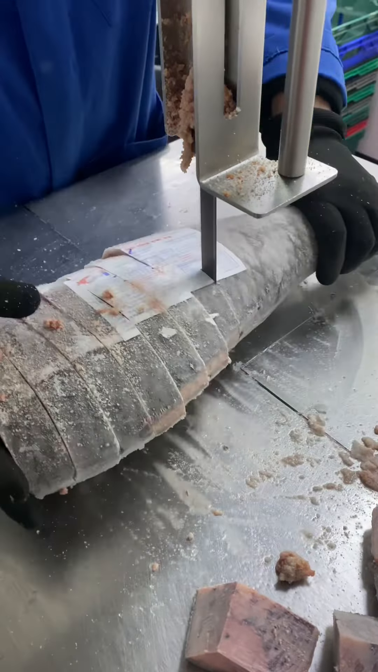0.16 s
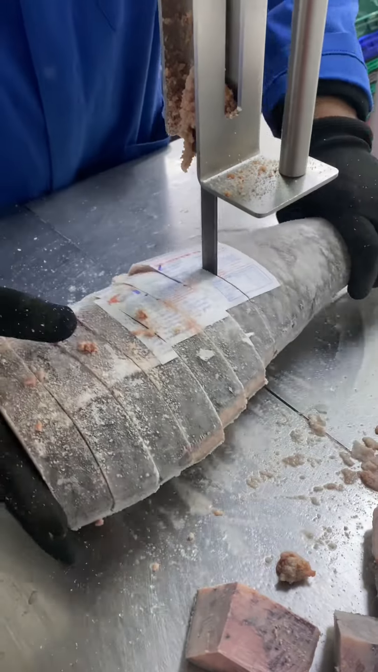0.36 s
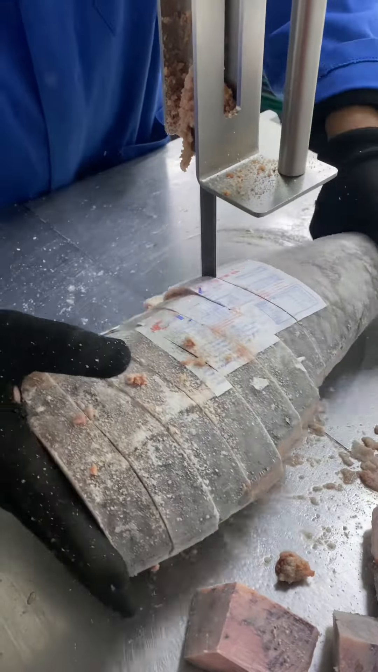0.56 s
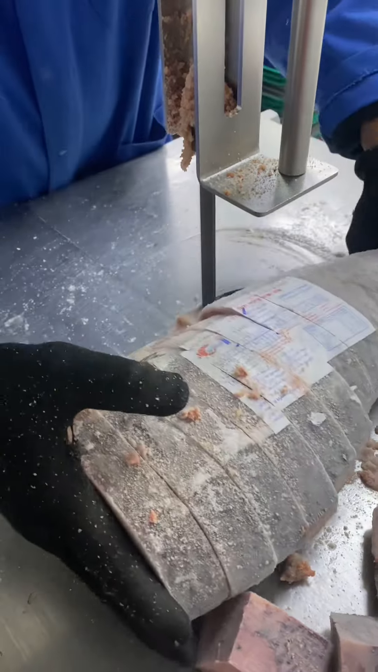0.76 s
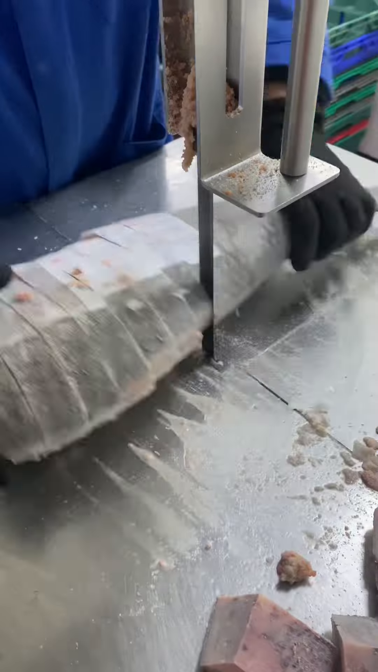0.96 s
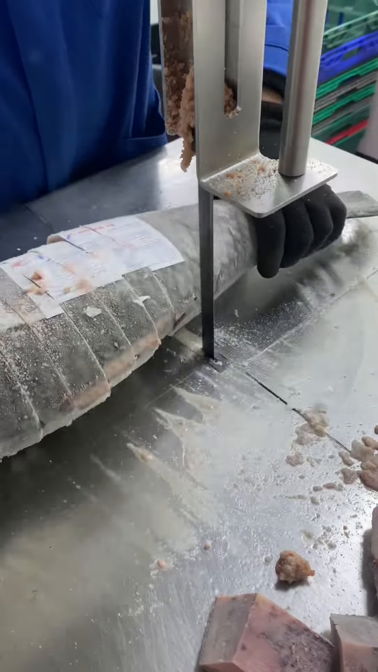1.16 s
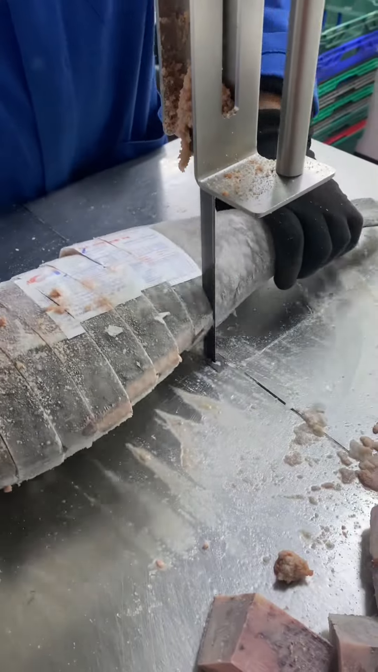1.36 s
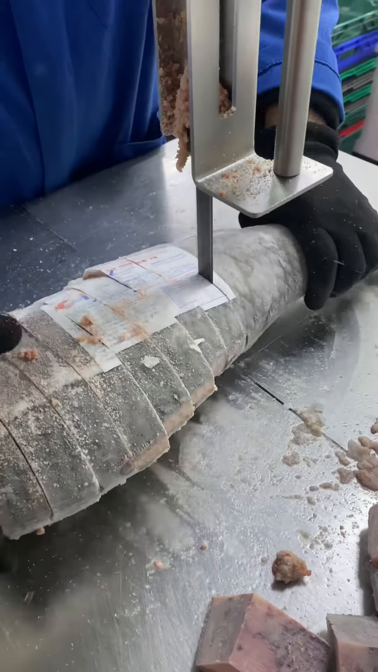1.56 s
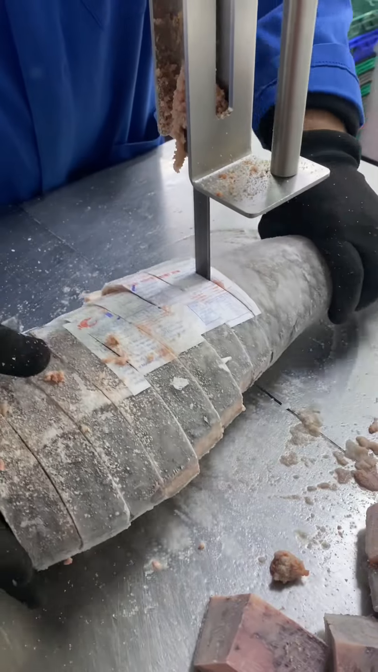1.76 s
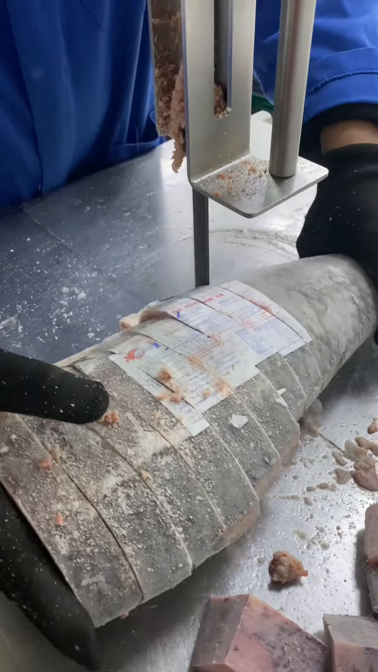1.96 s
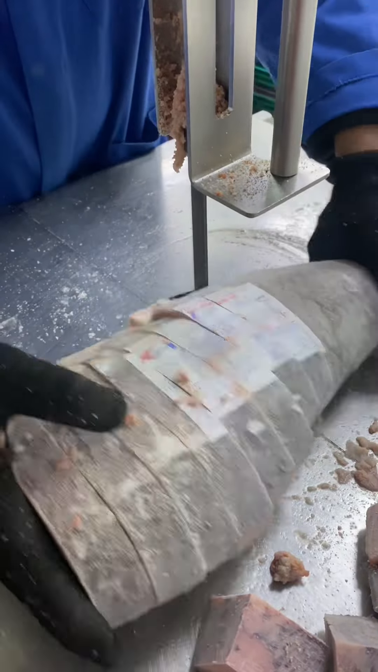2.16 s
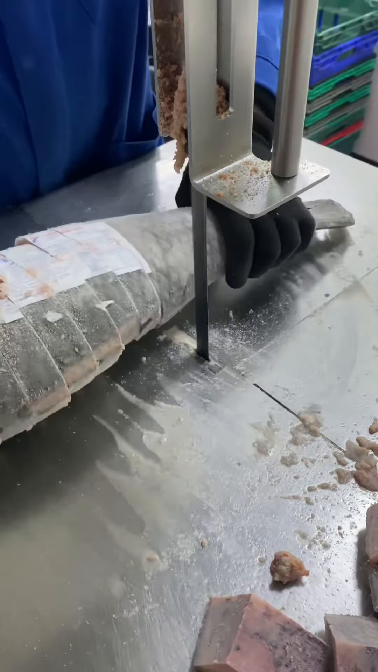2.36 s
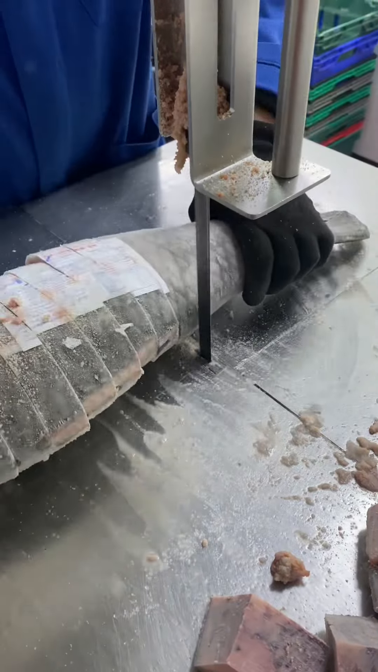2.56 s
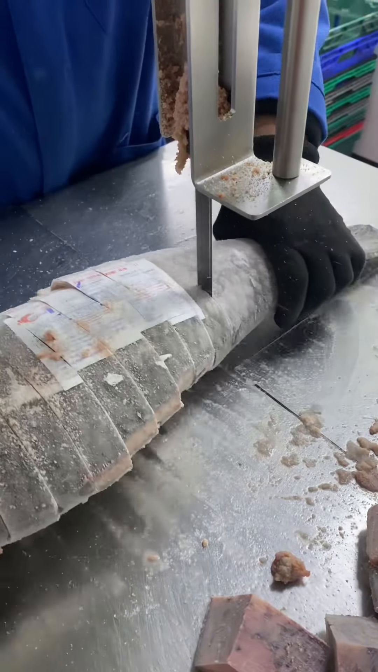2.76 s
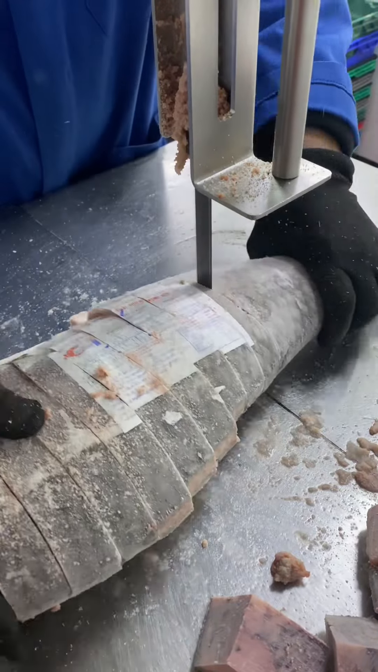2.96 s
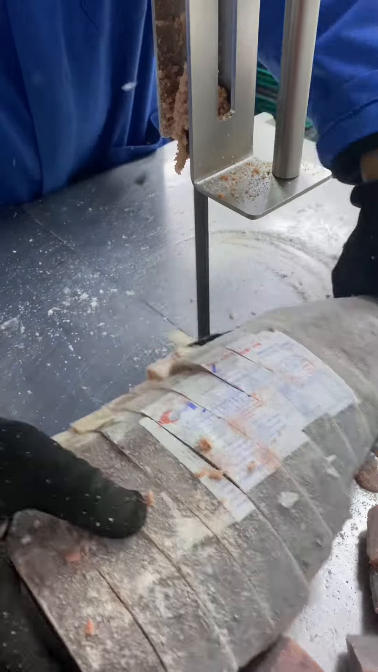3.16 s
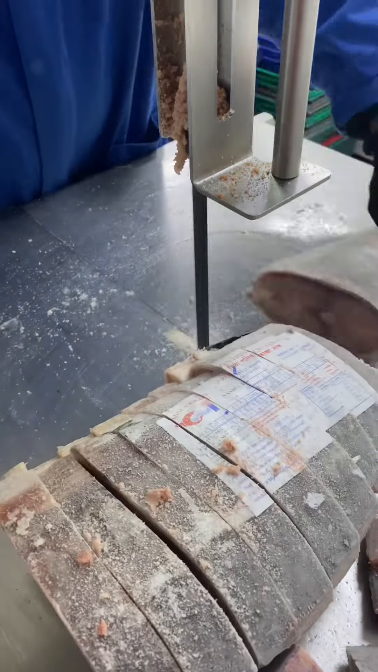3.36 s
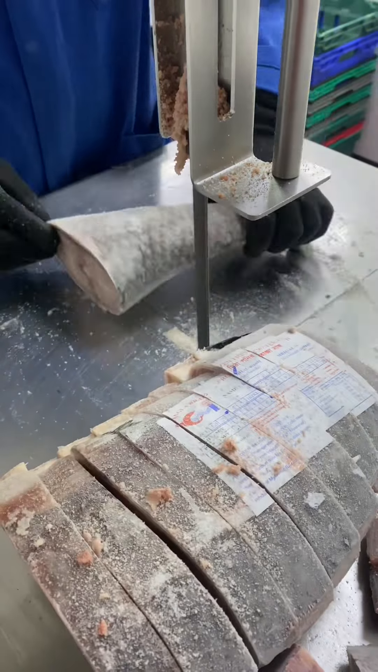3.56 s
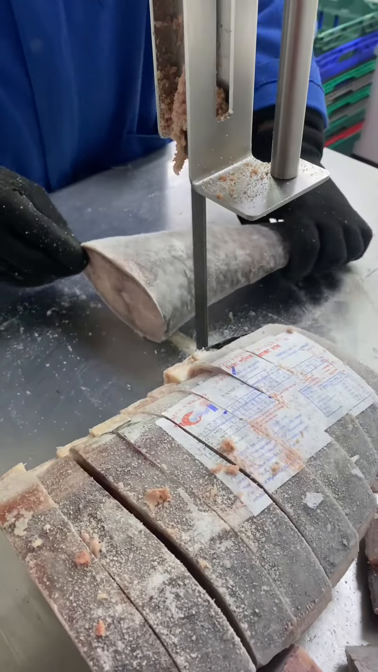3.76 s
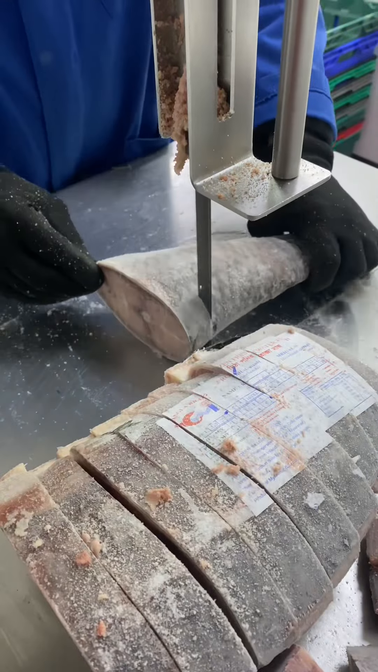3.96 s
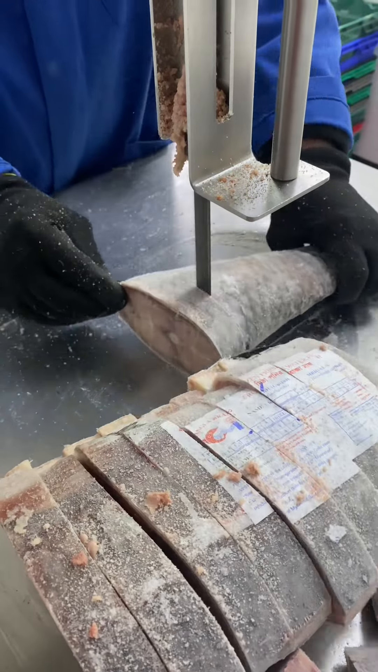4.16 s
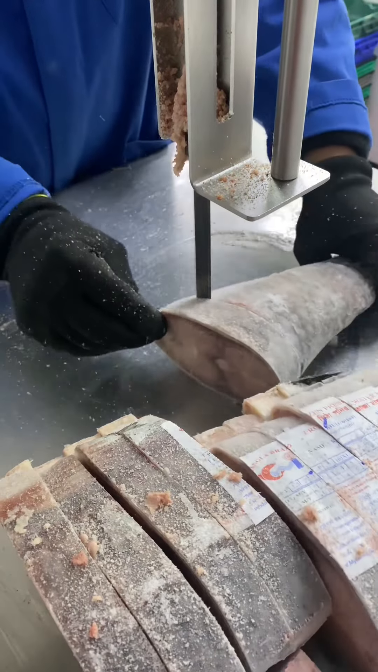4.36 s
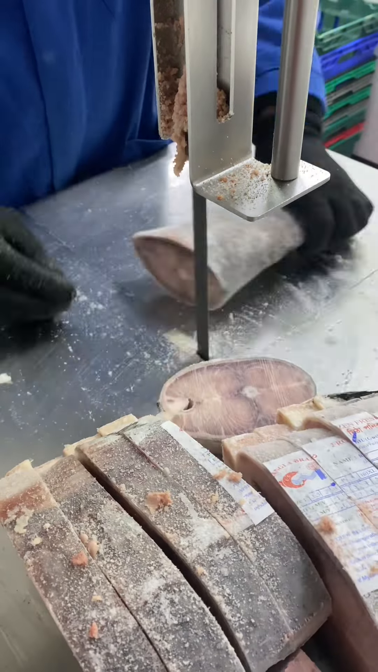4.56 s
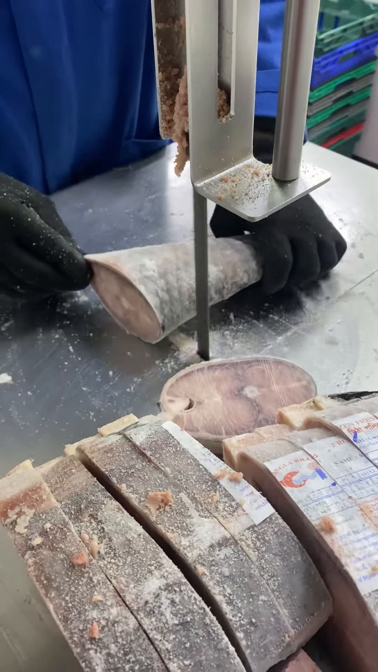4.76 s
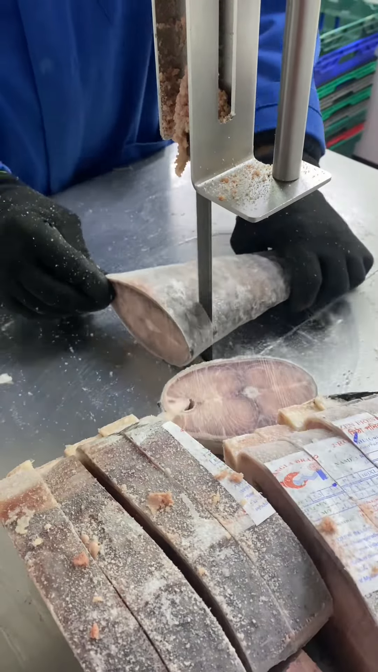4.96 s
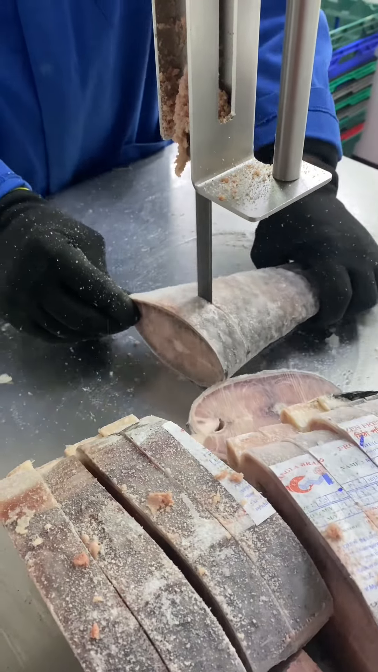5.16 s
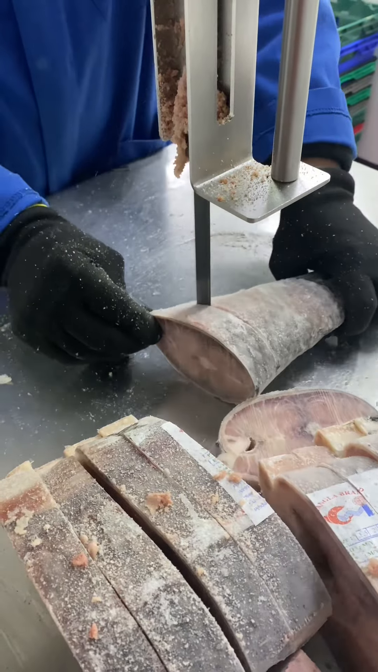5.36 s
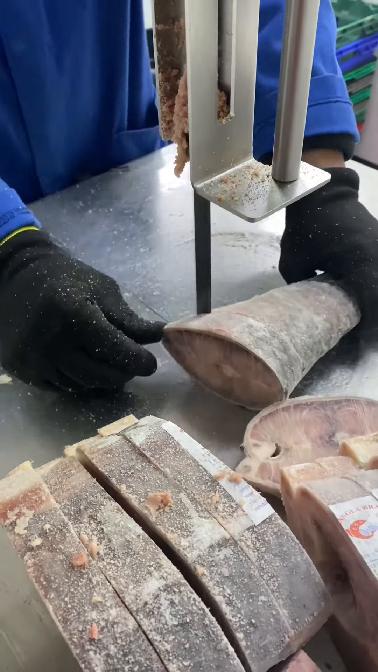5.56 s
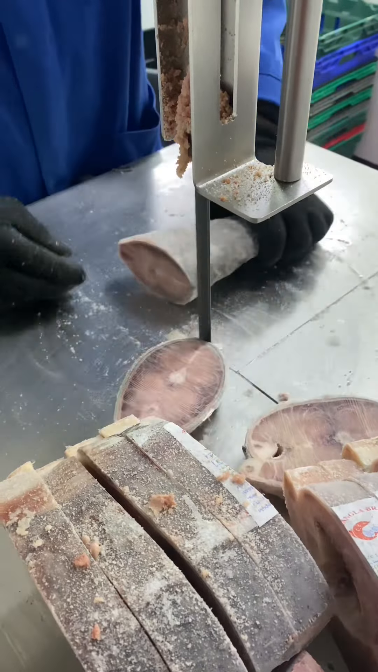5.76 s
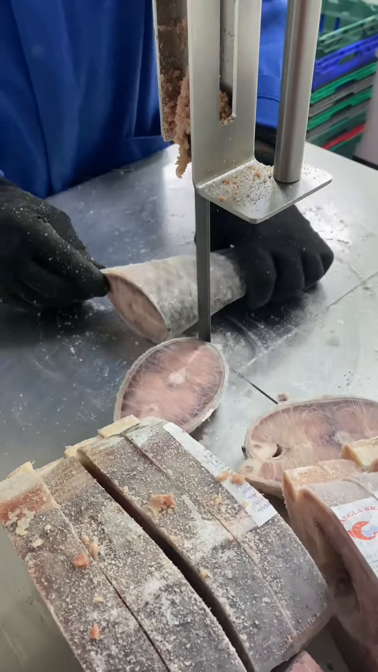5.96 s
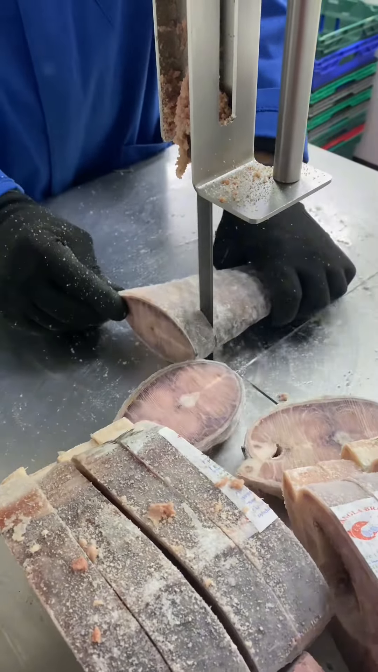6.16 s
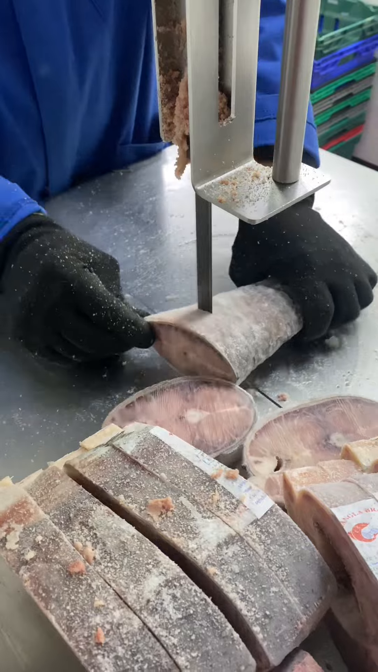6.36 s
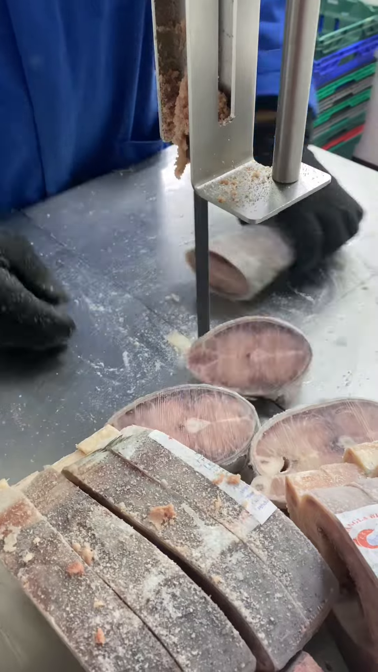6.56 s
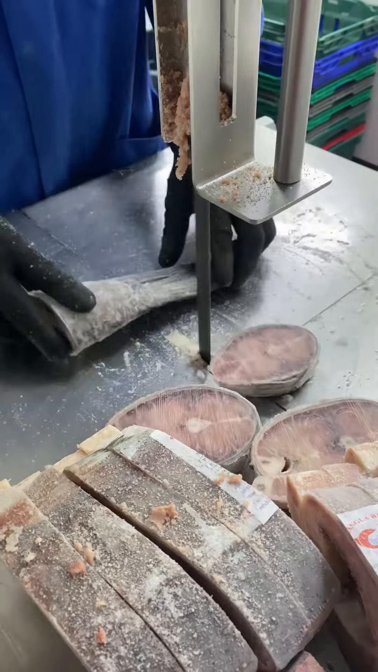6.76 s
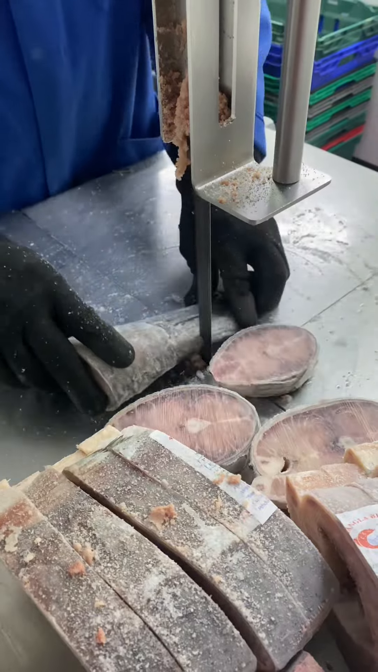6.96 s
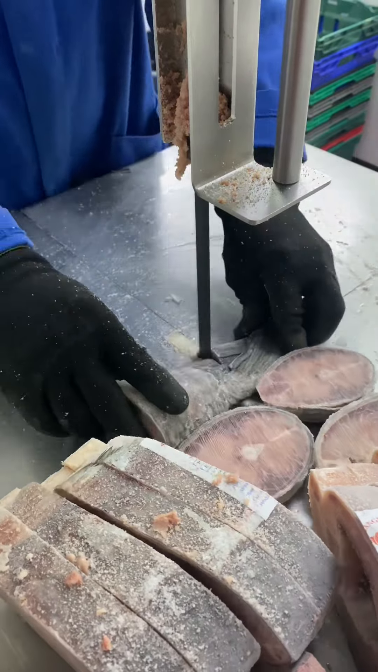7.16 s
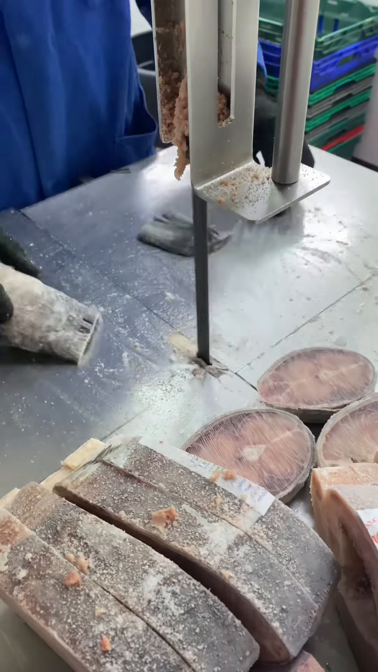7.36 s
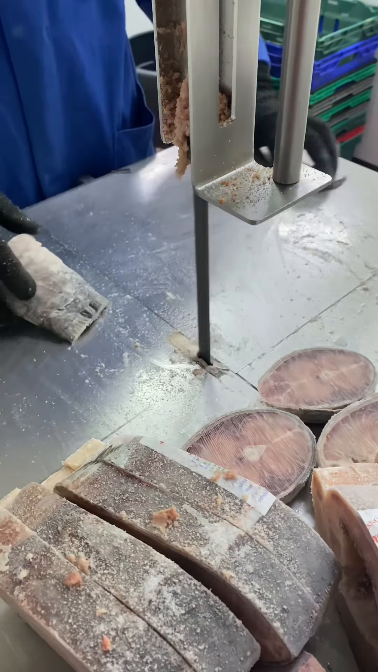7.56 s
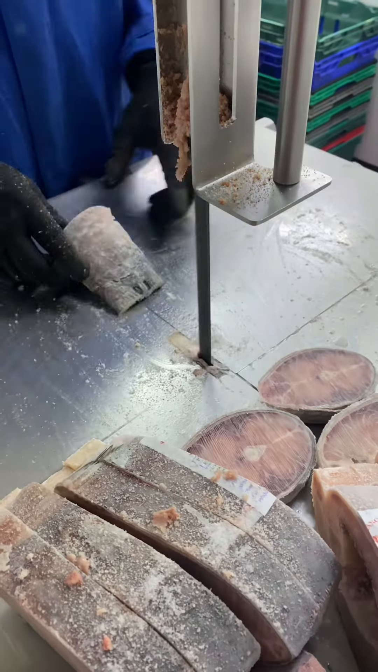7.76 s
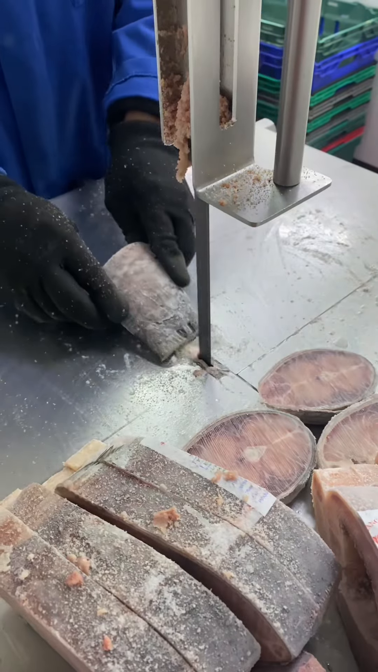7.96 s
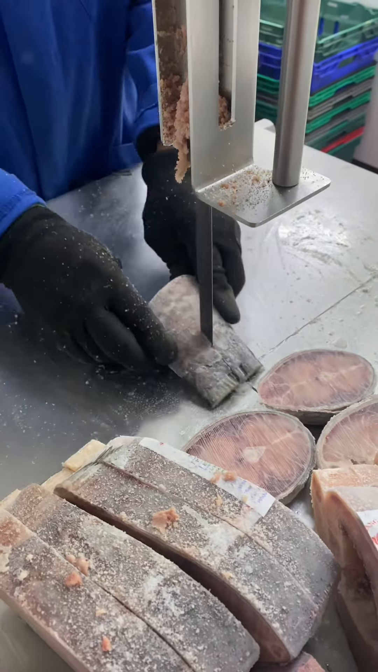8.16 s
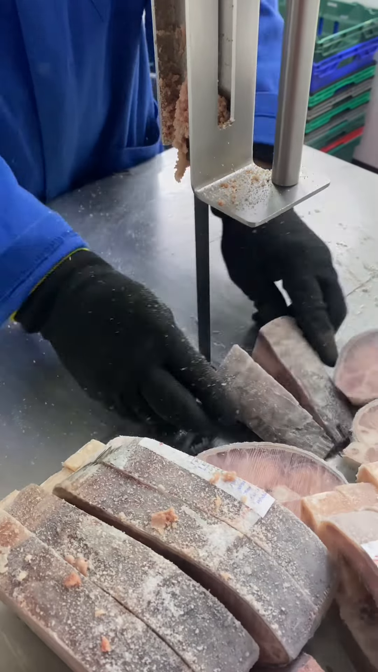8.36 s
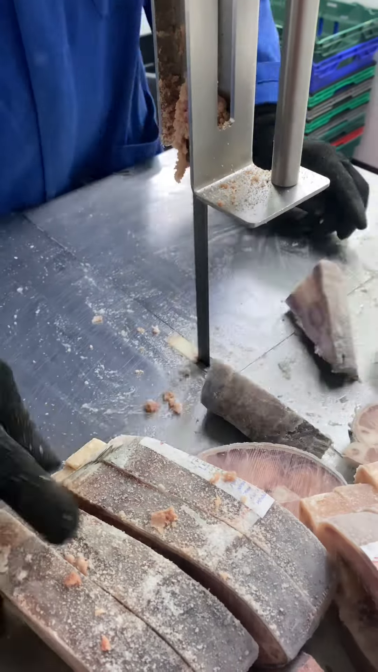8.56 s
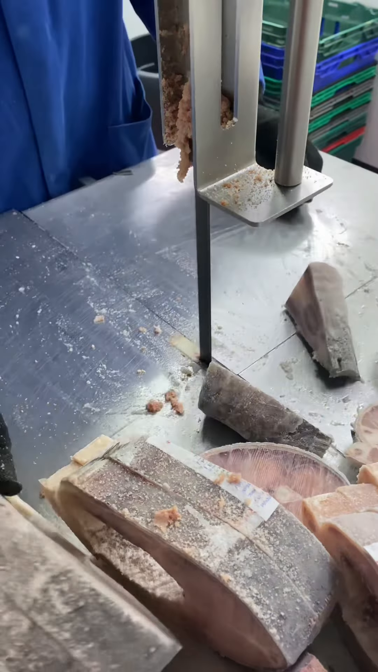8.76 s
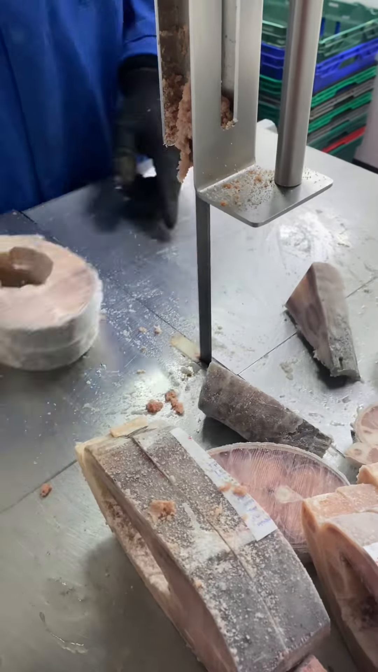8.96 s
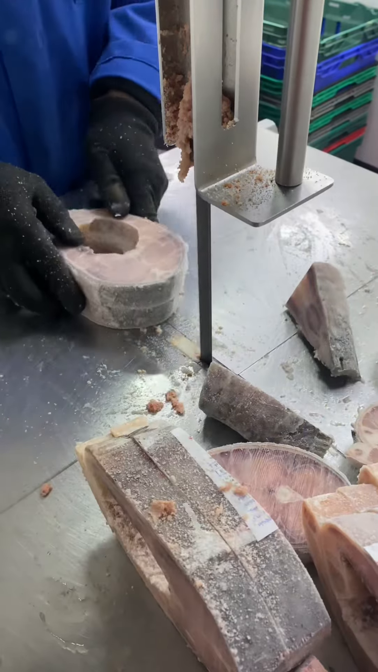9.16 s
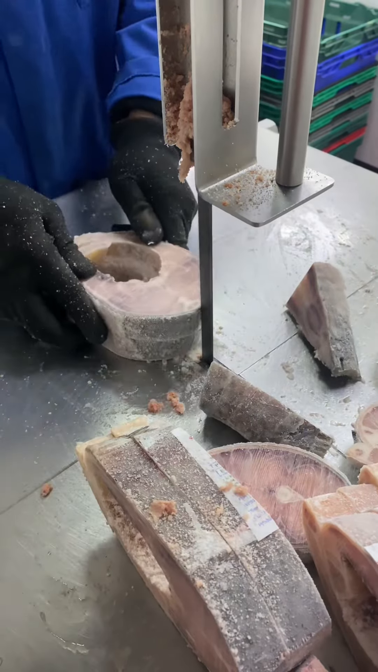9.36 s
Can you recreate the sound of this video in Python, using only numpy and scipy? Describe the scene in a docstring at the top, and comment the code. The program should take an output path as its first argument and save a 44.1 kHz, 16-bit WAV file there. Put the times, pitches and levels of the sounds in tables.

```python
"""A band saw is already cutting frozen fish on a steel table; nine cuts follow one another, with pauses.
In each cut the teeth strike steadily: a whine of overtones in grinding and groaning noise, until the blade
is out. All along, a motor rumbles and the running blade hisses, whistles and sizzles.
From the first cut on, slices knock on the table as short ringing tones, some with the snap of a bone.
Later, faint whines swell and fade, ice chips tick as short noise bursts, and the end falls in the last cut."""
import sys
import numpy as np
from scipy import signal
from scipy.fft import rfft, irfft, next_fast_len
from scipy.io import wavfile
from scipy.ndimage import uniform_filter1d, map_coordinates

SR = 44100
rng = np.random.default_rng(int(sys.argv[2]) if len(sys.argv) > 2 else 0)


def transcribe(signal):
    """Save signal, clipped to [-1, 1], as a 16-bit WAV file at the path in sys.argv[1]."""
    frames = np.atleast_2d(signal).T
    limited = np.clip(frames, -1, 1)
    pcm = np.round(limited * 32767).astype(np.int16)
    wavfile.write(sys.argv[1], SR, pcm)


def boost(x):
    """Linear amplitude factor 10**(x/20) for a level x in decibels (scalar or array-like)."""
    u = np.asarray(x, float) / 20
    return 10 ** u


N = 414981  # length of the scene in samples


def unit(x):
    """Scales a sound to an average strength (rms) of 1."""
    return x / np.sqrt(np.mean(np.abs(x) ** 2) + 1e-20)


def along(points, hz):
    """Reads a curve of (frequency [Hz], value) points, joined along a logarithmic frequency axis."""
    f, v = np.transpose(points)
    return np.interp(np.log(hz + 1), np.log(f + 1), v)


def curves(rows):
    """Turns rows of (time [s], values...) into one curve per value, with a point for every sample."""
    s, *cols = np.transpose(rows)
    return np.array([np.interp(np.arange(N) / SR, s, c) for c in cols])


def wobble(rate):
    """A random curve: straight lines between random points, rate points a second."""
    knots = rng.standard_normal(int(N * rate / SR) + 4)
    return map_coordinates(knots, [np.arange(N) * rate / SR], order=1)


def filtered(x, response):
    """Multiplies the spectrum of x by a response that depends on frequency."""
    m = next_fast_len(N + 8192)
    return irfft(rfft(x, m) * response(np.fft.rfftfreq(m, 1 / SR)), m)[..., :N]


def peaks(modes):
    """Gain of a set of resonances, each one a peak (center [Hz], width [Hz], height [dB])."""
    return lambda f: np.sqrt(sum(boost(2 * db) / (1 + (2 * (f - hz) / w) ** 2) for hz, w, db in modes))


def rush(gain, patchy_db):
    """Two unrelated noises of one color, joint rms 1, with shared random patches in time and pitch."""
    z = signal.stft(rng.standard_normal((2, N)), nperseg=256)[2]
    field = uniform_filter1d(rng.standard_normal(z.shape[1:]), size=4, axis=0)
    field = uniform_filter1d(field, size=8, axis=1)
    patchy = signal.istft(z * boost(patchy_db * unit(field)), nperseg=256)[1][:, :N]
    return unit(filtered(patchy, gain))


def passes():
    """Loudness of the cuts and of groan against grind [dB]; groan follows the fish depth at the blade."""
    # The cuts: (blade fully in [s], blade out [s], groan over the grind [dB],
    # share of the cut after which the fish thins [0 to 1])
    cut_times = [(0, 0.936, -1.5, 0.59), (1.226, 2.211, -3.5, 0.62), (2.506, 3.079, -5.5, 0.88),
                 (3.797, 4.37, -6.5, 1), (4.804, 5.527, -5, 0.34), (6.003, 6.378, -7, 0.84),
                 (6.863, 7.085, -24.5, 0.8), (7.998, 8.268, -20, 0.33), (9.286, 9.499, -5.5, 0.4)]
    touch_db, bite_db_per_s = -10.5, 504  # sudden first touch, this far under the full bite, then a rise
    last_db, leave_db_per_s = -19.5, 1092  # level at the exit time, and how fast it falls there
    shallow_db, deep_at = 9, 0.23  # groan lacking at entry, share of the cut where it is full
    thin_db = 20  # groan lost towards the exit
    t = np.arange(N) / SR
    start, end, groan_db, thins = np.transpose(cut_times)[..., None]
    bite_db = bite_db_per_s * (t - start)
    bite_db = bite_db + 6 * np.minimum(bite_db - touch_db, 0)  # much steeper before the touch level
    leave_db = leave_db_per_s * (end - t) + last_db
    gates_db = np.minimum(np.minimum(bite_db, leave_db), 0)
    now = np.argmax(gates_db, axis=0)[None]  # the cut that is loudest at each moment
    share = (t - start) / (end - start)
    shallow = np.clip(1 - share / deep_at, 0, 1)
    thinned = np.clip((share - thins) / (1.01 - np.minimum(thins, 1)), 0, 1)
    depth_db = groan_db - shallow_db * shallow - thin_db * thinned
    return np.maximum(gates_db.max(axis=0), -90), np.take_along_axis(depth_db, now, axis=0)[0]


def overtone_swells():
    """Single overtones swell or dip for a while, in bell shapes [dB]; one row for each overtone."""
    # One list for each overtone: (time [s], swell or dip [dB] before its weights in cutting(),
    # length [s], of which 0.72 is the spread of the bell)
    swell_lists = [
        [(.2, 14.5, 0.068), (.8, 5.5, 0.076), (1.291, 12, 0.017), (1.813, 8, 0.053), (2.033, 17, 0.0075),
         (2.564, 10.5, 0.089), (2.926, 11, 0.047), (3.867, 3, 0.026), (4.277, 12, 0.047), (4.96, 11.5, 0.12),
         (5.505, 8.5, 0.013), (6.201, 17, 0.04), (6.853, 18.5, 0.028), (7.03, 20.5, 0.13)],
        [(1.565, -0.5, .012), (2.76, 16, 0.0054), (3.062, 25.5, 0.028), (5.035, 12, 0.0026), (5.11, 5.5, 0.046),
         (6.36, 15.5, 0.0025), (7.005, 6, 0.051), (8.055, 12, 0.015), (8.105, 7.5, 0.02), (8.15, 10.5, 0.01),
         (8.1557, -23, 0.0011), (8.168, 15, 0.023), (8.23, 1.5, 0.016)],
        [(.226, 7.5, 0.079), (.866, 12.5, 0.012), (1.291, 10, 0.025), (2.877, 12.5, 0.0046),
         (3.867, 14.5, 0.058), (4.041, 11.5, 0.0047), (5.012, 12, 0.012), (5.078, 3.5, 0.0089),
         (5.505, 9, 0.051), (6.228, 10, 0.021), (7.02, 6, 0.04), (7.029, 4.5, 0.01)],
        [(.2, 12, .03), (1.45, 8, .08), (2, 9, .03), (2.69, 8, .03), (3.051, 23.5, .012), (4.07, 16, .03),
         (5.19, 12, .07), (6.24, 12, .04), (6.88, 7, .04), (8, 12, .025), (8.04, 12, .012), (8.098, 9, .012),
         (8.15, 12, .045), (8.245, 12, .014)],
        [(0, 11, 0.063), (.56, 5, 0.036), (.802, 6.5, 0.056), (1.291, 9, 0.041), (2.033, 4.5, 0.018),
         (2.673, 12.5, 0.022), (2.926, 6, 0.13), (3.867, 13, 0.095), (4.05, 8, 0.017), (5.042, 8, 0.022),
         (5.291, 10, 0.021), (5.497, 14, 0.017), (8.13, 4, 0.055)],
        [(0, 22, 0.048), (.56, 8, 0.079), (.802, 9, 0.075), (1.257, 9, 0.016), (2.69, 10.5, 0.054),
         (3.051, 25, 0.014), (4.091, 19, 0.014), (4.357, 10, 0.015), (5.083, 5.5, 0.021), (5.177, 7.5, 0.11),
         (6.135, 11, 0.019), (6.31, 15, 0.11), (6.855, 18.5, .0086), (6.923, 21, 0.029), (8.01, 17, 0.066),
         (8.115, 17.5, 0.016), (8.2, 17, 0.064)],
        [(.18, -4, 0.04), (.62, 17, 0.36), (1.407, 22, 0.0065), (1.47, 9, 0.043), (1.85, -8, .03),
         (5.491, 28, 0.0089), (6.159, 19, 0.019), (6.2, 10.5, 0.093), (6.256, 18, .0072), (8.02, 13, 0.052),
         (8.16, 12, .045)],
        [(.04, 11, 0.017), (1.63, 4, .04), (1.89, 13.5, 0.054), (5.073, 11.5, 0.015), (6.2, 8, 0.23),
         (6.9, 10.5, 0.096), (7.999, 10.5, 0.011), (8.02, 9.5, 0.062), (8.036, 5.5, 0.0047)],
    ]
    t = np.arange(N) / SR
    swells_db = np.zeros((len(swell_lists), N))
    for row, swells in zip(swells_db, swell_lists):
        for s, db, length in swells:
            near = slice(max(round((s - 4 * length) * SR), 0), round((s + 4 * length) * SR))
            row[near] += db * np.exp(-.5 * ((t[near] - s) / (0.72 * length)) ** 2)
    return swells_db


def overtone_levels(whine_db, chatter_db):
    """Each overtone grows with the whine at its own pace [dB], and also drifts on its own."""
    # Overtones of the tooth rate: (level at the usual whine [dB], gain per dB of whine [dB])
    overtone_rows = [(-55.5, -0.5), (-44.5, 1.9), (-41, 0.88), (-52.5, 2), (-40, 0.98), (-46.5, 1),
                     (-47, 1.5), (-38.5, .5)]
    usual_whine_db, wander_db = -42, 3
    return np.array([db + grows * (whine_db - usual_whine_db) + wander_db * wobble(38) + chatter_db
                     for db, grows in overtone_rows])


def tooth_whine(over_db, groan_db):
    """Teeth strike at a steady rate that sags under load; multiples of this rate form the whine."""
    free_hz, sag_hz = 1849, 17  # tooth rate when free, and its drop at full load
    full_db, load_span_db = -44, 16  # groan level of full load, and how far below it the load is zero
    load = np.clip(1 + (groan_db - full_db) / load_span_db, 0, 1)
    load = uniform_filter1d(load, size=SR // 8)  # the wheels' mass smooths it
    turn = 2 * np.pi * np.cumsum((free_hz - sag_hz * load) * (1 + .0035 * wobble(28))) / SR
    whine = np.zeros((2, N))
    for k, db in enumerate(over_db, 1):
        steady = 1 + .35 * (wobble(130) + 1j * wobble(130))
        apart = .4 * (wobble(70) + 1j * wobble(70))
        flutter = np.array([steady, apart])
        # uneven teeth blur each overtone
        smear = np.array([wobble(90 * k) + 1j * wobble(90 * k) for row in whine])
        whine += np.real((boost(db + .5) * flutter + boost(db - 6) * smear) * np.exp(1j * k * turn))
    return whine


def held_strikes(groan_db, overtones):
    """Strikes held back by the fish come unevenly: blurred tones, flat of the free tooth rate."""
    # Pitch and strength: (time [s], lowest tone [Hz], level over the groan [dB] before overtone gains)
    held_rows = [(0, 1770, -6), (.1, 1745, 0), (.19, 1710, 3), (.25, 1770, -4), (.34, 1700, 1),
                 (.45, 1780, -5), (.9, 1795, -6), (1.22, 1760, -2), (1.4, 1785, -2), (1.55, 1755, 1),
                 (1.7, 1775, -1), (1.9, 1750, -1), (2.2, 1790, -6), (2.5, 1750, 0), (2.6, 1760, 2),
                 (2.67, 1790, 1), (2.74, 1770, 0), (3.05, 1800, -6), (3.8, 1720, -6), (3.92, 1750, 5),
                 (3.96, 1650, 2), (4, 1690, 3), (4.06, 1730, 3), (4.13, 1710, 0), (4.2, 1785, -2),
                 (4.35, 1800, -6), (4.8, 1710, -2), (4.9, 1690, -1), (4.97, 1740, 1), (5.05, 1800, -4),
                 (5.3, 1750, -2), (5.5, 1800, -6), (6, 1770, -5), (6.07, 1710, -3), (6.17, 1790, -3),
                 (8.19, 1790, -3), (8.21, 1800, 20), (8.27, 1775, 22), (8.3, 1780, -4)]
    ring_db, fall_db = 6.5, 6  # the second overtone rings most; loss per overtone away from 2.3
    held_hz, held_db = curves(held_rows)
    turn = 2 * np.pi * np.cumsum(held_hz) / SR
    tones = np.zeros((2, N))
    for k in range(1, overtones + 1):
        drag = np.array([wobble(40 + 45 * k) + 1j * wobble(40 + 45 * k) for row in tones])
        level_db = groan_db + held_db + ring_db - fall_db * min(abs(k - 2.3), 2)
        tones += boost(level_db) * np.real(drag * np.exp(1j * k * turn))
    return tones


def grinding(grind_db):
    """Chips break off in a dense uneven patter: colored noise with fast random loudness."""
    # Color of the grinding noise: (frequency [Hz], relative gain [dB])
    grind_color = [(600, -14.5), (1000, -18), (1400, -8), (2300, -8.5), (2900, -4), (4500, -5),
                   (6400, -1.5), (8200, 1.5), (10000, 0), (11900, 3), (14000, 11)]
    # The grinding noise rolls off steeply above 14.4 kHz: (frequency [Hz], added gain [dB])
    grind_rolloff = [(14400, 0), (15000, -6), (15300, -13), (15750, -12), (15950, -80)]
    chip_db, chips_per_s, lift_db = 2.2, 700, 9.5
    noise = rush(lambda f: boost(along(grind_color, f) + along(grind_rolloff, f)), patchy_db=2.2)
    return boost(grind_db + lift_db) * noise * boost(chip_db * wobble(chips_per_s))


def groaning(groan_db):
    """The loaded blade resonates: noise shaped by its peaks."""
    # Resonances of the loaded blade, whose joint gain is squared below:
    # (center [Hz], width before squaring [Hz], height before squaring [dB])
    blade_peaks = [(1393, 150, 3.5), (1600, 200, 1.5), (1760, 240, 3), (2650, 400, -3), (3500, 420, 6),
                   (4600, 500, 0), (5150, 300, 3), (5430, 240, 7)]
    return boost(groan_db + 6.5) * rush(lambda f: peaks(blade_peaks)(f) ** 2, patchy_db=3.5)


def cutting():
    """The blade in the fish: feed, depth and overtone swells set the whine, grinding and groan."""
    # How hard the fish is fed, one list for each cut:
    # (time [s], grind [dB], whine [dB]), before the cut's gate, chatter and lifts
    feed_lists = [
        [(.03, -34.5, -44.5), (.144, -37.5, -37.5), (.226, -39.5, -36), (.264, -37.5, -39.5),
         (.478, -46, -47.5), (.652, -44, -46.5), (.674, -40.5, -36), (.802, -47, -48), (.866, -40, -52)],
        [(1.219, -40, -43.5), (1.343, -35.5, -46), (1.449, -32.5, -33), (1.495, -41, -37.5), (1.571, -36, -31),
         (1.813, -41.5, -52), (1.977, -47, -48), (2.033, -39.5, -44.5), (2.069, -42.5, -54.5),
         (2.193, -36.5, -46)],
        [(2.502, -36, -43.5), (2.564, -34, -47.5), (2.778, -37, -33.5), (2.814, -41.5, -40),
         (2.926, -39.5, -41.5), (3.022, -47.5, -49.5), (3.06, -33, -49.5)],
        [(3.799, -37, -53), (3.867, -39.5, -53.5), (3.997, -35, -40), (4.081, -34, -36), (4.119, -35.5, -42),
         (4.277, -40, -40.5), (4.357, -43.5, -47)],
        [(4.813, -37, -49.5), (4.935, -35.5, -43), (5.035, -39, -35), (5.177, -40, -36), (5.263, -36.5, -41.5),
         (5.425, -39, -40.5), (5.463, -45, -39), (5.505, -41, -47.5)],
        [(6.001, -40, -47.5), (6.135, -38.5, -44.5), (6.201, -39.5, -38.5), (6.305, -40.5, -42.5),
         (6.365, -38, -40)],
        [(6.853, -35, -38), (6.923, -35.5, -45.5), (7.003, -32.5, -33.5), (7.051, -33, -40)],
        [(7.984, -35, -46.5), (8.054, -40.5, -42.5), (8.075, -36, -50.5), (8.1, -41, -37.5),
         (8.17, -40.5, -40.5), (8.21, -43, -46.5), (8.245, -42.5, -39)],
        [(9.286, -46, -48), (9.352, -45, -54), (9.41, -53, -51.5)],
    ]
    gate_db, depth_db = passes()
    feed_db, whine_db = curves(np.concatenate(feed_lists))
    chatter_db = gate_db + 1.98 * wobble(70) + 0.79 * wobble(250)  # the feed is never even
    grind_db = feed_db + chatter_db
    groan_db = grind_db + depth_db
    swells_db = overtone_swells()
    all_swells_db = swells_db.sum(axis=0)
    over_db = overtone_levels(whine_db, chatter_db)
    over_db += 1.037 * swells_db + 0.053 * all_swells_db  # the others follow a little
    grind_db = grind_db + 0.039 * all_swells_db
    whine = tooth_whine(over_db, groan_db) + held_strikes(groan_db, len(over_db))
    return whine + grinding(grind_db) + groaning(groan_db)


def running():
    """The motor rumbles; the blade hisses, whistles and sizzles in its guides: four colored noises."""
    # Levels: (time [s], rumble [dB], running hiss [dB], whistle [dB]), before random wobble
    idle_rows = [(0, -54.5, -46, -45), (.89, -50, -50.5, -67), (1.73, -53.5, -52.5, -64),
                 (2.41, -52.5, -50.5, -59.5), (3.2, -52, -50, -53), (3.82, -51, -52, -58),
                 (4.58, -49.5, -47, -51.5), (5.13, -53.5, -50, -67.5), (5.66, -53, -53.5, -58),
                 (6.21, -50.5, -49.5, -62), (6.71, -48.5, -45.5, -54), (7.25, -49, -42.5, -44.5),
                 (7.55, -46.5, -42.5, -50), (7.86, -44.5, -47, -52.5), (8.1, -49.5, -51, -69.5),
                 (8.39, -54.5, -51, -51.5), (8.6, -47.5, -46.5, -52), (9.17, -50.5, -50.5, -60.5),
                 (9.41, -46.5, -40.5, -44.5)]
    # Color of the motor rumble: (frequency [Hz], relative gain [dB])
    rumble_color = [(12, -48), (20, -13), (37, -10.5), (117, -1.5), (189, -7.5), (282, -12.5), (380, -16),
                    (490, -16.5), (700, -47), (910, -70), (1540, -120)]
    # Color of the blade's hiss: (frequency [Hz], relative gain [dB])
    hiss_color = [(300, -40), (500, -2.5), (900, -0.5), (1600, -4), (2200, -1), (2800, 3), (3800, -0.5),
                  (5000, -2), (6500, 2), (8000, -3), (10500, -10.5), (13200, -10), (14800, -66),
                  (15700, -47), (15950, -84)]
    # Color of the sizzle: (frequency [Hz], relative gain [dB])
    sizzle_color = [(6000, -15), (9000, 0), (12500, 0), (15000, 10.5), (15700, -6), (15950, -83)]
    # Resonances of free blade and wheels, whose joint gain is squared below:
    # (center [Hz], width before squaring [Hz], height before squaring [dB])
    whistle_peaks = [(668, 40, -16), (1405, 50, -7), (1890, 60, -8), (2250, 80, -9), (2450, 100, -5),
                     (2650, 70, -3.5), (2780, 200, -8), (3280, 120, -7), (4320, 90, -9), (6500, 400, -11)]
    sizzle_db = -7.5  # against the hiss
    rumble_db, hiss_db, whistle_db = curves(idle_rows)
    rumble = rush(lambda f: boost(along(rumble_color, f)), patchy_db=1.7)
    rumble *= boost(rumble_db + .7 * wobble(8.1))
    hiss = rush(lambda f: boost(along(hiss_color, f)), patchy_db=2)
    hiss *= boost(hiss_db + .8 * wobble(20))
    whistle = rush(lambda f: peaks(whistle_peaks)(f) ** 2, patchy_db=3.5)
    whistle *= boost(whistle_db + 1.5 * wobble(12))
    sizzle = rush(lambda f: boost(along(sizzle_color, f)), patchy_db=2)
    sizzle *= boost(hiss_db + sizzle_db + 2.1 * wobble(60))
    return rumble + hiss + whistle + sizzle


def ring(modes, t, attack):
    """A struck body: tones (Hz, dB, time to fall 60 dB) die away, each at a fresh random strength."""
    tones = sum(boost(db + rng.normal(0, 2) - 60 * t / t60) * np.sin(2 * np.pi * hz * t)
                for hz, db, t60 in modes)
    return tones * (1 - np.exp(-t / attack))


def on_table(hits):
    """Adds a second row, the table's late echo: half as strong and 40 samples later."""
    return np.array([hits, 0.5 * np.roll(hits, 40)])


def knocks():
    """Slices knock on the table and bones snap: table, slice and crack ring, with a puff of noise."""
    # Knocks: (time [s], thud [dB], slab [dB], crack [dB], pitch factor: small slices ring higher);
    # these levels add to those of the modes
    knock_rows = [(0.443, -62, -43.5, -72.5, 1.32), (0.866, -57.5, -50.5, -74, 0.99),
                  (1.949, -45.5, -57, -65, 1.1), (3.058, -65, -63, -28, 1.47), (3.324, -44, -56, -55, 0.76),
                  (3.436, -54, -56, -62, 0.97), (4.061, -28.5, -64.5, -61, 0.47),
                  (4.359, -45, -44, -62, 0.72), (4.4413, -54.5, -44, -30.5, 0.81),
                  (4.449, -55, -47, -43, 0.58), (5.521, -40.5, -44.5, -63, 0.677),
                  (5.621, -68, -76, -28, 1.11), (6.521, -53.5, -50, -54.5, 0.74),
                  (8.154, -75, -70, -29, 1.7), (8.8745, -44, -22, -24, 1.04), (8.884, -43, -62, -36, 1.15)]
    # Table frame: (frequency [Hz], level [dB], time to fall 60 dB [s])
    thud_modes = [(125.5, 9, 0.078), (218, -2, 0.12)]
    # Frozen slice on steel, at pitch factor 1: (frequency [Hz], level [dB], time to fall 60 dB [s])
    slab_modes = [(285, 2.5, 0.019), (464, 7, 0.077), (610, 1.5, 0.067), (728, 2, 0.042), (796, 12, 0.024),
                  (900, 3, 0.028), (1058, 6, 0.032), (1300, -7, 0.029)]
    # Crack, at pitch factor 1: (frequency [Hz], level [dB], time to fall 60 dB [s])
    crack_modes = [(1500, -8, .012), (1970, -1, .028), (2150, 2, .03), (2450, -1, .028), (2900, -2, .02),
                   (3550, -6, .016), (4200, -7, .016), (4930, -4, .018)]
    puff_loss_db = 14  # the puff weakens as the pitch factor rises past one
    hits = np.zeros(N + SR)
    t = np.arange(SR // 5) / SR
    for s, thud_db, slab_db, crack_db, pitch in knock_rows:
        puff_db = crack_db + 3 - puff_loss_db * max(pitch - 1, 0) - 60 * t / .02
        puff = boost(puff_db) * uniform_filter1d(rng.standard_normal(len(t)), size=5)
        thud = boost(thud_db) * ring(thud_modes, t, 0.0028)
        slab = boost(slab_db) * ring(slab_modes, t * pitch, .0012)  # faster time: higher and shorter
        crack = boost(crack_db) * ring(crack_modes, t * pitch, 0.00063)
        hits[round(s * SR):][:len(t)] += thud + slab + crack + puff
    return on_table(hits[:N])


def whines():
    """Faint whines come and go: thin tones of unsteady pitch and level swell and fade."""
    # Whines: (time of the middle [s], pitch before wavering [Hz],
    # level before flicker and a 3.5 dB cut [dB], spread of the bell-shaped swell [s])
    whine_rows = [(2.33, 2654, -55, .06), (2.35, 3570, -59, .08), (3.14, 1415, -58, .04),
                  (3.19, 2664, -52, .06), (3.15, 2480, -57, .06), (3.31, 1395, -57, .07),
                  (3.3, 2661, -58, .05), (3.3, 4320, -61, .05), (3.4, 2458, -58, .05),
                  (3.65, 2475, -60, .07), (4.52, 2635, -54, .05), (4.66, 668, -61, 0.12),
                  (4.68, 1405, -59, .06), (4.7, 2625, -57, .05), (4.7, 4323, -61, .05),
                  (5.68, 2640, -57, .04), (5.82, 4250, -63, .12), (6.5, 1780, -54, .03),
                  (6.68, 4310, -57, .12), (6.7, 1396, -57, .05), (6.73, 668, -58, .09),
                  (7.25, 2670, -48, .1), (7.45, 2660, -47, .1), (7.68, 2655, -53, .07),
                  (7.3, 1400, -58, .12), (7.55, 1400, -60, .1), (7.2, 3035, -50, .1),
                  (7.48, 2980, -48, .06), (7.52, 4305, -53, .04), (7.2, 4320, -58, .08),
                  (7.66, 670, -57, .07), (7.82, 3035, -51, .06), (7.89, 3290, -54, .06),
                  (7.96, 3400, -56, .02), (7.92, 4305, -58, .06), (7.94, 2452, -58, .04),
                  (8.34, 2655, -57, .05), (8.52, 2650, -54, .05), (8.51, 1990, -54, .05),
                  (8.77, 1992, -49, .08), (8.6, 1800, -57, .07), (8.57, 1896, -57, .06),
                  (8.72, 972, -59, .07), (8.74, 2665, -55, .07), (8.8, 2995, -58, .06),
                  (9.06, 3226, -55, .08), (9.21, 2440, -58, .06)]
    t = np.arange(N) / SR
    tones = np.zeros((2, N))
    waver, flicker = wobble(45), wobble(40)
    for k, (s, hz, db, length) in enumerate(whine_rows):
        near = slice(round((s - 3 * length) * SR), min(round((s + 3 * length) * SR), N))
        # each tone reads the shared random curves from a later starting point
        chance = slice(k * 5000, k * 5000 + near.stop - near.start)
        now_hz = hz + 24 * waver[chance] + .002 * hz * flicker[chance]
        turn = 2 * np.pi * np.cumsum(now_hz) / SR
        swell = np.exp(-.5 * ((t[near] - s) / length) ** 2)
        level = boost(db - 3.5 + 5 * flicker[chance]) * swell
        tones[:, near] += level * np.array([np.sin(turn), -np.cos(turn)])
    return tones


def ice_ticks():
    """Chips of ice tick off the steel: bright noise bursts that fall 60 dB in 16 ms."""
    # Ticks: (time [s], starting level [dB] before a 2 dB cut and the filter)
    tick_rows = [(2.2383, -32.5), (6.4348, -30), (7.149, -16.5), (7.2704, -25.5), (7.4739, -28),
                 (7.555, -26.5), (7.7007, -30.5), (7.7657, -25), (8.3833, -33)]
    ticks = np.zeros(N + SR)
    t = np.arange(SR // 5) / SR
    for s, db in tick_rows:
        ticks[round(s * SR):][:len(t)] += boost(db - 2 - 60 * t / .016) * rng.standard_normal(len(t))
    return on_table(filtered(ticks[:N], lambda f: 1 / (1 + (8000 / (f + 1)) ** 6)))


def scene():
    """Two rows: the sound both channels share, and the sound in which they differ."""
    return cutting() + running() + knocks() + whines() + ice_ticks()


def roll_off(x):
    """The treble ends steeply here."""
    return signal.sosfilt(signal.butter(12, 17010, fs=SR, output="sos"), x)


def record(dry):
    """Likeness, lead and balance of the left and right channels in each frequency band."""
    # How far the left channel leads: (frequency [Hz], lead [cycles])
    left_lead = [(520, 0), (780, .15), (1640, .08), (2840, .45), (3620, .22), (5000, .02), (5800, .05),
                 (6400, .5), (7150, .5), (7350, .46), (7550, .5), (8200, .5), (9500, 1), (11600, 1),
                 (12500, 1.5), (12880, 1.4), (13300, 1.5), (14400, 1.5), (15300, 2)]
    # Likeness of the left and right channels: (frequency [Hz], likeness [0 to 1])
    channel_likeness = [(60, .97), (400, .9), (1000, .45), (2500, .5), (4500, .4), (5400, .9), (6100, .5),
                        (6600, .9995), (8100, .9995), (8600, .5), (9500, .9995), (11650, .9995),
                        (12000, .5), (12500, .9995), (14200, .9995), (14900, .6), (15500, .9995)]
    # Balance of the channels: (frequency [Hz], left minus right [dB])
    channel_balance = [(60, -.5), (130, -2), (250, -3), (500, -1.5), (800, 1), (1500, 2), (3000, 0)]
    # Dips in the treble of both channels: (frequency [Hz], gain [dB])
    treble_dips = [(11000, 0), (11700, -3), (12700, -1), (13400, -10), (13900, 0)]
    top_hz = 15900  # nothing passes from here up

    def mixing(f):
        angle = np.arccos(np.clip(along(channel_likeness, f), 0, 1)) / 2
        return np.array([np.cos(angle), np.sin(angle)])

    def channel_response(f):
        # half of the balance and lead goes to each channel, in opposite directions
        left = boost(along(channel_balance, f) / 2) * np.exp(1j * np.pi * along(left_lead, f))
        return np.array([left, 1 / left]) * boost(along(treble_dips, f)) * (f < top_hz)

    shared, apart = filtered(dry, mixing)
    channels = filtered(np.array([shared + apart, shared - apart]), channel_response)
    return roll_off(channels)


dry = scene()
out = record(dry)
transcribe(out)
```